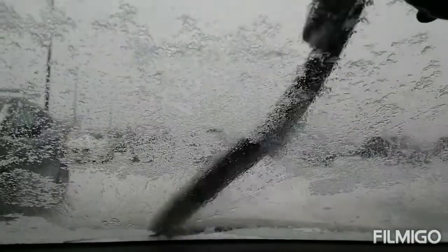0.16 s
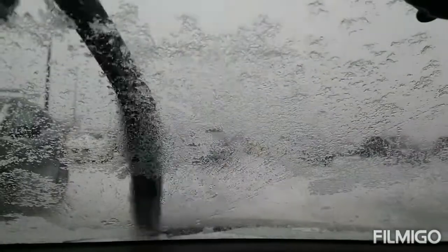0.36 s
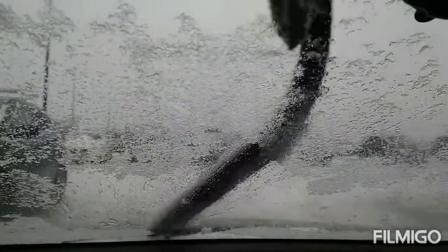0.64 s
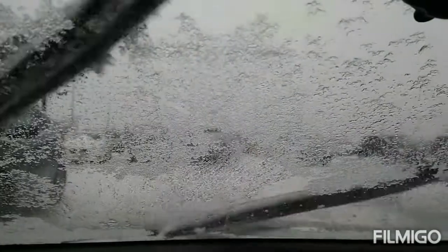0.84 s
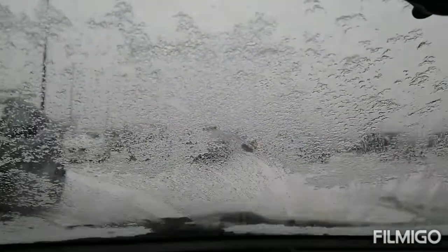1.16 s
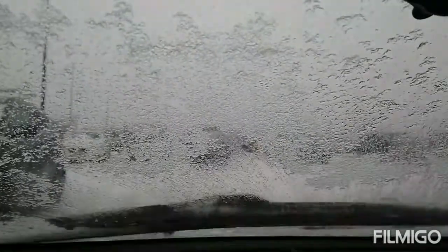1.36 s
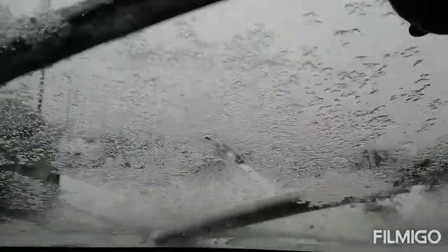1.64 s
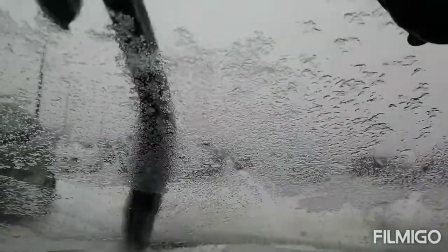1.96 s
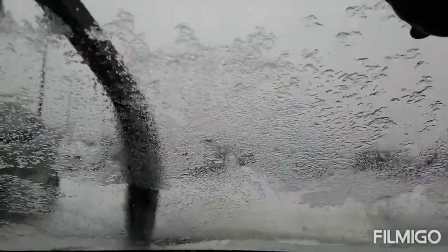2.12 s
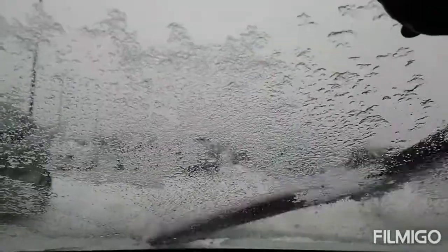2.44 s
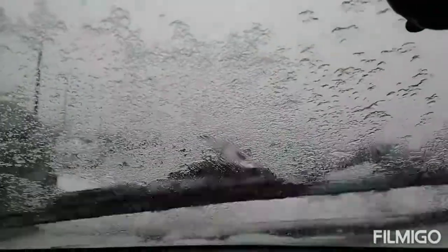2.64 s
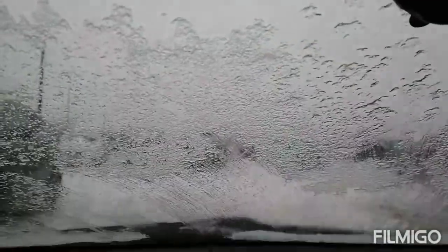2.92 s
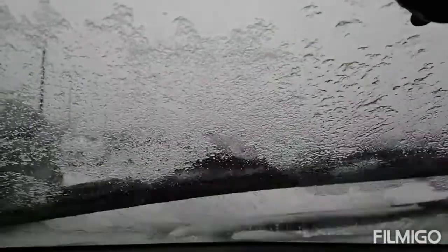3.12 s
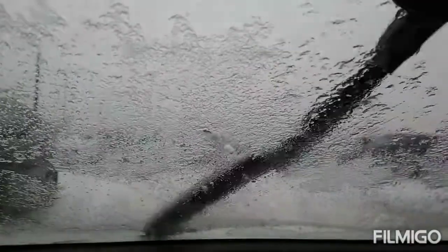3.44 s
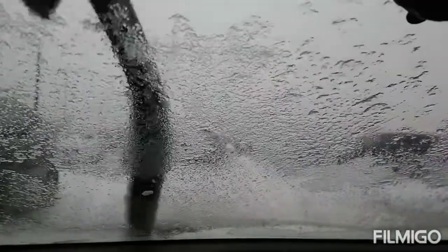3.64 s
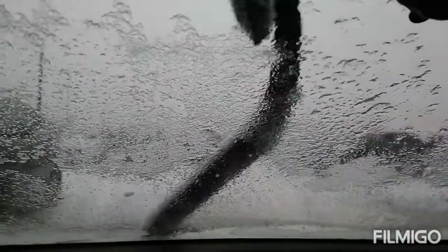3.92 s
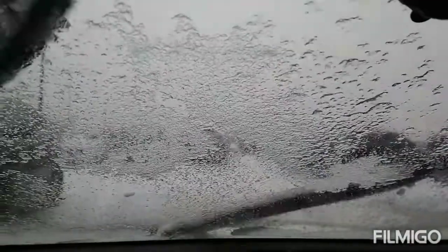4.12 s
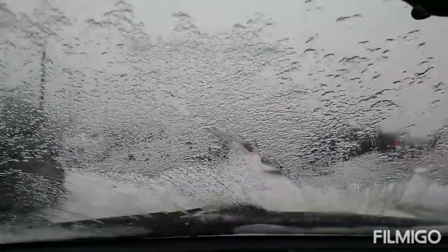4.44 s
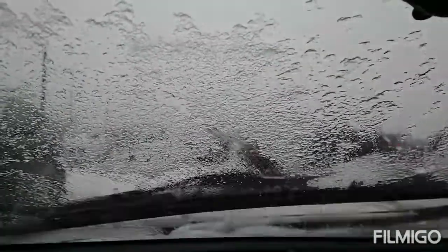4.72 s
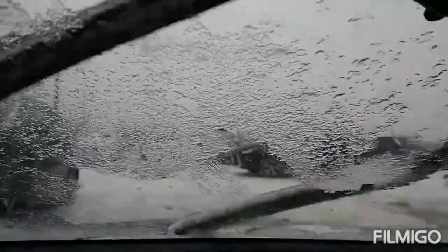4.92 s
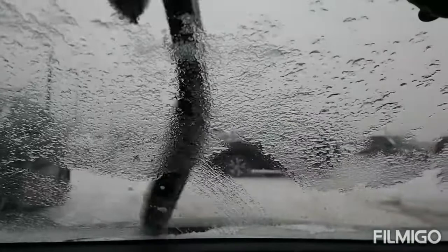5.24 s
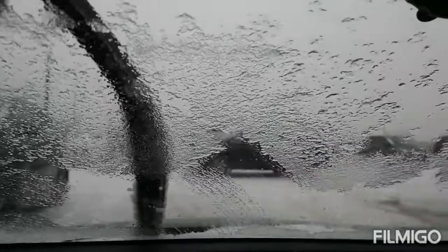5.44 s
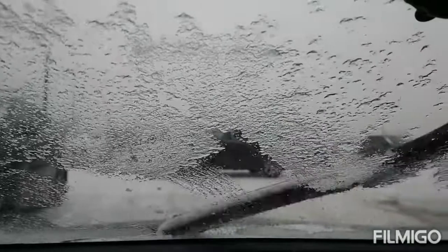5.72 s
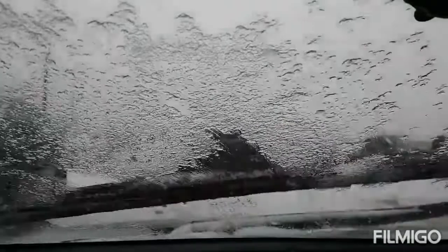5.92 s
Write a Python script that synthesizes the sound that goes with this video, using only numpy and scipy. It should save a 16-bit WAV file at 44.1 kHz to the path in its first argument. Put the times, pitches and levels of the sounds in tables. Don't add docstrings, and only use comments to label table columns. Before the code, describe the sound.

Inside a parked car in wintry weather, a close stereo microphone hears wiper blades working over an icy, slushy windshield. A faint steady fan and weather hiss is there from the start, as an up stroke ends and the blades turn at about 0.5 seconds. They scrape down, crushing a lump of ice near 1.0, then thump dully at 1.25 and turn with a small knock around 1.35. The cycle repeats every 1.65 seconds or so, with low turns near 3.0 and 4.7 and brief softer dips at the top near 2.2, 3.85 and 5.5. Each stroke is a gritty, crunching rasp with fine sizzle, glass rumble and uneven, shuddering cabin boom. Thumps return around 2.9 and 4.6, the last with the loudest knock. From about 3.5 seconds gusts throw pattering sleet on the glass. The final down stroke is still scraping around 6 seconds.

```python
import sys
import numpy as np
from scipy import signal
from scipy.fft import rfft, irfft, next_fast_len
from scipy.io import wavfile
from scipy.ndimage import uniform_filter1d

SR = 44100
rng = np.random.default_rng(int(sys.argv[2]) if len(sys.argv) > 2 else 0)


def nominal_scale(level):
    x = np.asarray(level, float) / 20
    return 10 ** x


def output_pcm(signal):
    pcm = np.clip(np.atleast_2d(signal).T, -1, 1) * 32767
    wavfile.write(sys.argv[1], SR, np.round(pcm).astype(np.int16))


N = 267731

# [Hz, dB per Hz]
LEFT_PORT = [(25, -75), (36, -42), (180, -46), (300, -52.5), (480, -53), (1200, -62.5), (3300, -60.5),
             (4050, -68.5), (4700, -63.5), (6400, -63.5), (7500, -70.5), (8050, -80.5), (8800, -73.5),
             (15500, -84)]
RIGHT_PORT = [(25, -77), (36, -46.5), (180, -47.5), (300, -55), (440, -56), (1200, -63), (1800, -61.5),
              (2200, -61.5), (4300, -59), (5000, -61), (7200, -81.5), (8000, -99.5), (11500, -88.5),
              (15000, -84)]
PORT_LAG_S = 0.0005
# [Hz, Hz, dB]
CABIN_MODES = [(41.2, 12, 4.5), (70, 27, -1.3), (111.3, 11, -0.5), (129, 20, -6), (170.6, 66, 3.2)]
# [Hz, Hz, dB]
PANE_MODES = [(237, 65, 1.5), (286, 16, 1.5), (368.2, 30, 2), (530, 160, -8), (796, 80, -2.5),
              (1050, 760, 2)]
# [Hz, Hz, dB]
BLADE_MODES = [(1826, 72, 6.5), (2390, 220, 2.5), (3400, 550, -5), (4820, 650, 2), (4960, 320, -5)]

# [s, dB]
SLEET = [(0, -100), (3.3, -67), (3.68, -51), (3.75, -54), (3.82, -47), (3.9, -58), (4.35, -47.5),
         (4.55, -51), (4.7, -52.5), (4.8, -49), (5.2, -60), (5.43, -51), (5.55, -54), (6.07, -52)]
# [s, dB, s]
CHIPS = [
    (1.01, -21.5, 0.013),
    (1.288, -35, 0.014),
    (2.43, -28, 0.016),
    (4.758, -31, 0.011),
]
# [s, dB]
THUMPS = [
    (1.248, -12.5),
    (1.283, -17.5),
    (1.366, -17),
    (2.225, -28),
    (2.908, -12),
    (2.986, -15.5),
    (4.582, -16.5),
    (4.637, -14),
    (5.555, -18),
]
# [s, dB]
KNOCKS = [
    (1.348, -29),
    (3.006, -28),
    (4.657, -26.5),
]

LOW_TURN_S, CYCLE_S, TOP_TURN_S = 1.371, 1.656, 0.822
# [s, dB, dB]
BITE = [(0.012, -26.5, 12), (0.05, -9.5, -3), (0.099, 2, -7), (0.25, 1.5, 2), (0.45, -0.3, -1.5),
        (0.62, -1.5, -1.5), (0.73, -6.5, -0.5), (0.785, -15, 2), (0.812, -22.5, 8), (0.87, -22.5, -4),
        (0.919, -7, 11), (1.04, 1, 4), (1.11, -0.5, 2), (1.19, 3.5, 1), (1.37, 2.2, 4.5), (1.46, -0.5, 1),
        (1.53, 1.5, -4.5), (1.6, -12.5, 5)]
# [s, dB, dB, dB, dB]
STROKES = [
    (0.15, 0.5, 1, -0.5, 0.1),
    (0.95, -1.5, -1.5, -1.8, 1.1),
    (1.8, 1.9, 1.7, 0.1, 0.5),
    (2.6, -0.8, 0.1, -0.7, 1),
    (3.45, 1.6, 1.6, 1.1, -0.5),
    (4.3, -1.4, -0.4, 0.7, 1.5),
    (5.1, 1, -0.1, -1.7, -0.3),
    (5.9, -1.3, 1.8, -1.2, 1),
]
# [s, dB]
JUDDERS = [(0.02, 0.5), (0.3, 2.5), (0.8, 4.5), (1.03, 3.5), (1.15, 1.5), (1.27, 0), (1.56, 2.5),
           (1.92, 3.5), (2.44, 4.5), (2.72, 1.5), (3.14, 0.5), (3.3, -1), (3.5, -3.5), (3.8, 0),
           (3.95, -0.5), (4.3, -0.5), (4.41, -0.5), (4.86, 5.5), (4.96, 5.5), (5.3, 3), (5.42, 0.5),
           (5.75, 1.5), (6.03, 2.5)]
JUDDER_S, JUDDER_IN_PANE, JUDDER_IN_SCRAPE = 0.045, 0.35, 0.12
# [s, dB]
PATCHES = [(0.2, -0.5), (0.82, -1), (1.5, -3.5), (1.78, 2), (2.08, 0.5), (2.42, 1), (2.48, -1), (2.75, 0.5),
           (3.18, -2.5), (3.4, 1.5), (3.55, -0.5), (4.2, -0.5), (4.58, -1), (4.93, 0.5), (5.35, -2),
           (5.62, 1), (5.83, 1)]
PATCH_S, PATCH_IN_DULL, PATCH_IN_SIZZLE = 0.029, 0.86, 1.3

CREEP = 0.073
HEAP_S, HEAP_WIDTH_S, HEAP_DB = 1.375, 0.16, 3.5
WET_FROM, WET_UP_DB, WET_DOWN_DB = 0.48, 0, -7

IDLE_DB, AIR_DB = -44.5, -67.5
SCRAPE_DB, PANE_DB, BOOM_DB, SIZZLE_DB, SPRAY_DB = -27, -27.5, -23, -44.5, -46.5
PANE_IDLE_DB, PANE_LAG_S = -39, 0.0083
PANE_FOLLOWS, BOOM_FOLLOWS = (0.31, 0.31), (0.07, 0.09)
SIZZLE_FOLLOWS, SPRAY_FOLLOWS = (0.28, 0.88), (0.3, 0.8)

ROUND_DB, ROUND_SPREAD_DB, ROUND_FROM_HZ = -7.5, 5.5, 6800
ROUND_OWN_SHARE, ROUND_RISE_DB = 0.4, 5


def rms_one(x):
    mean = np.mean(np.atleast_2d(x), axis=0)
    return x / np.sqrt(np.mean(mean ** 2) + 1e-20)


def in_time(rows):
    s, *columns = np.transpose(rows)
    return [np.interp(np.arange(N) / SR, s, c) for c in columns]


def drift(rate_hz):
    pole = np.exp(-2 * np.pi * rate_hz * 40 / SR)
    noise = rng.standard_normal(N // 40 + 2002)
    slow = signal.lfilter([1], [1, -2 * pole, pole ** 2], noise)[2000:]
    return np.interp(np.arange(N) / 40, np.arange(len(slow)), rms_one(slow))


def judder(rows, width_s):
    t = np.arange(0, N, 40) / SR
    swell = sum(db * np.exp(-0.5 * ((t - s) / width_s) ** 2) for s, db in rows)
    return np.interp(np.arange(N) / SR, t, swell)


def motion():
    into = (np.arange(N) / SR - LOW_TURN_S) % CYCLE_S
    up = into < TOP_TURN_S
    share = np.where(up, into / TOP_TURN_S, (into - TOP_TURN_S) / (CYCLE_S - TOP_TURN_S))
    speed_db = 10 * np.log10(np.sin(np.pi * share) ** 2 + CREEP ** 2)
    heap_db = HEAP_DB * np.exp(-0.5 * ((into - HEAP_S) / HEAP_WIDTH_S) ** 2)
    wet_db = np.where(up, WET_UP_DB, WET_DOWN_DB) * np.clip((share - WET_FROM) / 0.25, 0, 1)
    s, *columns = np.transpose(BITE)
    bite_db, bright_db = [np.interp(into, s, c, period=CYCLE_S) for c in columns]
    return bite_db, bright_db, speed_db, heap_db, wet_db


def grains(per_s, spread_db, alike, lag_s=0):
    sizes = nominal_scale(spread_db * np.minimum(rng.exponential(1, (3, N)), 5)) * rng.choice([-1, 1], (3, N))
    shared, left, right = sizes * (rng.random((3, N)) < per_s / SR)
    late = np.roll(shared, round(lag_s * SR))
    alike = np.clip(alike, 0, 1)
    return np.sqrt(alike) * np.array([shared, late]) + np.sqrt(1 - alike) * np.array([left, right])


def through_ports(x, low_hz, high_hz, modes=(), between_db=0):
    size = next_fast_len(N, real=True)
    hz = np.maximum(np.fft.rfftfreq(size, 1 / SR), 1)
    band = 1 / np.sqrt((1 + (low_hz / hz) ** 8) * (1 + (hz / high_hz) ** 8))
    power = nominal_scale(between_db) ** 2
    power = power + sum(nominal_scale(db) ** 2 / (1 + (2 * (hz - f) / w) ** 2) for f, w, db in modes)
    ports = []
    for port in (LEFT_PORT, RIGHT_PORT):
        port_hz, port_db = np.transpose(port)
        ports.append(nominal_scale(np.interp(np.log(hz), np.log(port_hz), port_db)))
    return rms_one(irfft(rfft(x, size) * band * np.sqrt(power) * ports, size)[:, :N])


def ring(events, hz, t60, soft_s):
    out, t = np.zeros(N + SR), np.arange(SR // 4) / SR
    shape = np.sin(2 * np.pi * hz * t) * nominal_scale(-60 * t / t60) * (1 - np.exp(-t / soft_s))
    shape = shape / np.max(np.abs(shape))
    for s, db in events:
        start = round(s * SR)
        out[start:start + len(t)] += nominal_scale(db) * shape
    return out[:N]


def with_sleet(db, sleet_share_db):
    return np.hypot(nominal_scale(db), nominal_scale(in_time(SLEET)[0] + sleet_share_db))


def idle():
    air = rng.standard_normal((2, N))
    return nominal_scale(IDLE_DB) * through_ports(air, 360, 2100) + nominal_scale(AIR_DB) * through_ports(air, 7300, SR / 2)


def spray():
    bite_db, _, speed_db, _, wet_db = motion()
    dry_db = in_time(STROKES)[-1]
    dust_db = SPRAY_DB + dry_db + wet_db + PATCH_IN_SIZZLE * judder(PATCHES, PATCH_S)
    dust_db = dust_db + SPRAY_FOLLOWS[0] * bite_db + SPRAY_FOLLOWS[1] * speed_db + 1.8 * drift(9.7)
    gain = with_sleet(dust_db, sleet_share_db=2.2) * nominal_scale(4.5 + 0.5 * drift(10))
    return gain * through_ports(grains(20000, 3.0, alike=0.01), 15300, SR / 2)


def chips():
    t = np.arange(N) / SR
    burst = sum(nominal_scale(db) * np.exp(-np.maximum(t - s, 0) / length) * (t >= s) for s, db, length in CHIPS)
    bright = signal.lfilter([1, -0.95], [1], grains(5100, 2.3, alike=0.1))
    return burst * through_ports(bright, 2500, 15750)


def linkage():
    thumps = -ring(THUMPS, 94.0, t60=0.073, soft_s=0.0055)
    knocks = ring(KNOCKS, 740, t60=0.025, soft_s=0.0015) * nominal_scale(2)
    knocks = knocks + ring(KNOCKS, 630, t60=0.02, soft_s=0.0015) * nominal_scale(-2)
    return thumps * nominal_scale(np.array([[1.1], [-1.1]])) + knocks * nominal_scale(np.array([[0.5], [-0.5]]))


def blades():
    bite_db, bright_db, speed_db, heap_db, wet_db = motion()
    strength_db, pane_db, cabin_db, dry_db = in_time(STROKES)
    judder_db, patch_db = judder(JUDDERS, JUDDER_S), judder(PATCHES, PATCH_S)
    grip_db = 0.5 * drift(22)

    boom_db = BOOM_DB + cabin_db + BOOM_FOLLOWS[0] * bite_db + BOOM_FOLLOWS[1] * speed_db + heap_db + judder_db
    deep = through_ports(grains(3000, 2.6, alike=1.0), 33, 87, CABIN_MODES, between_db=-7)
    boom = through_ports(grains(3000, 2.6, alike=0.87), 60.5, 290, CABIN_MODES, between_db=-6.5)
    air = nominal_scale(boom_db) * (nominal_scale(-8.0) * deep + nominal_scale(-1.5) * boom)

    scrape_db = SCRAPE_DB + strength_db + bite_db + JUDDER_IN_SCRAPE * judder_db
    pane_db = PANE_DB + pane_db + PANE_FOLLOWS[0] * bite_db + PANE_FOLLOWS[1] * speed_db
    t = np.arange(N) / SR
    late_db = np.interp(t - PANE_LAG_S, t, pane_db)
    pane_db = 10 * np.log10(nominal_scale(late_db) ** 2 + nominal_scale(PANE_IDLE_DB) ** 2)
    thin_db = 0.72 * pane_db + 0.29 * scrape_db
    pane = through_ports(grains(5000, 1.8, alike=0.77), 214, 564, PANE_MODES, between_db=-10.5)
    thin_grains = grains(8000, 2.15, alike=0.34, lag_s=PORT_LAG_S)
    thin = through_ports(thin_grains, 471, 1890, PANE_MODES, between_db=-0.5)
    glass = nominal_scale(pane_db - 0.5 + JUDDER_IN_PANE * judder_db + 0.32 * grip_db) * pane
    glass = glass + nominal_scale(thin_db - 5.0 + 0.42 * grip_db) * thin

    ice = grains(14000, 2.56, alike=0.25, lag_s=PORT_LAG_S)
    dull = through_ports(ice, 1500, 3490, BLADE_MODES, between_db=3.5)
    bright = through_ports(ice, 3300, 10700, BLADE_MODES, between_db=3.5)
    dull_db = scrape_db - 4.5 - bright_db / 2 + 0.7 * drift(30) + PATCH_IN_DULL * patch_db
    sharp_db = scrape_db - 4.0 + bright_db / 2 + 0.7 * drift(30) + patch_db
    scrape = with_sleet(dull_db, sleet_share_db=1.0) * dull + with_sleet(sharp_db, sleet_share_db=8.5) * bright

    sizzle_db = SIZZLE_DB + dry_db + 0.9 * wet_db + PATCH_IN_SIZZLE * patch_db
    sizzle_db = sizzle_db + SIZZLE_FOLLOWS[0] * bite_db + SIZZLE_FOLLOWS[1] * speed_db
    sizzle_gain = with_sleet(sizzle_db, sleet_share_db=1.5) * nominal_scale(6.5 + grip_db + 0.42 * drift(25))
    sizzle = sizzle_gain * through_ports(grains(20000, 2.8, alike=0.012), 6570, 9500)
    return air + glass + nominal_scale(-2.12 + grip_db) * scrape + sizzle


def scene():
    return idle() + spray() + chips() + linkage() + blades()


def round_treble(x):
    hop, start = 1024, 1024 - 56
    n, k = np.arange(2 * hop) + 0.5, np.arange(hop) + 0.5
    line_hz = k * SR / (2 * hop)
    cosines = np.cos(np.pi / hop * np.outer(k, n + hop / 2)) * np.sqrt(2 / hop)
    basis = np.sin(np.pi * n / (2 * hop)) * cosines
    blocks = np.pad(x, ((0, 0), (hop + start, 2 * hop - (N + start) % hop))).reshape(2, -1, hop)
    lines = np.concatenate([blocks[:, :-1], blocks[:, 1:]], axis=2) @ basis.T

    scrape = np.sqrt(np.mean(lines[..., 93:280] ** 2, axis=2, keepdims=True))
    own = np.sqrt(np.mean(lines.reshape(2, -1, 32, 32) ** 2, axis=3))
    mood_db = 1.9 * rng.standard_normal(scrape.shape)
    rise_db = ROUND_RISE_DB * np.log2(np.maximum(line_hz[16::32] / 8000, 1))
    lasting = np.sqrt(3) * uniform_filter1d(rng.standard_normal((len(own[0]), 128)), size=3, axis=0)
    step = own ** ROUND_OWN_SHARE * scrape ** (1 - ROUND_OWN_SHARE) * nominal_scale(ROUND_DB + rise_db + mood_db)
    step = np.repeat(step, 32, axis=2) * np.repeat(nominal_scale(ROUND_SPREAD_DB * lasting), 8, axis=1) + 1e-9
    rounded = np.sign(lines) * np.floor(np.abs(lines) / step + 0.4) * step

    frames = np.where(line_hz > ROUND_FROM_HZ, rounded, lines) @ basis
    lapped = frames[:, 1:, :hop] + frames[:, :-1, hop:]
    return lapped.reshape(2, -1)[:, start:start + N]


def roll_off(x):
    return signal.sosfilt(signal.butter(12, 15750, fs=SR, output="sos"), x)


def record(dry):
    high_pass = signal.butter(4, 33, "high", fs=SR, output="sos")
    cut = signal.sosfilt(high_pass, dry)
    mix = round_treble(0.7 * np.tanh(cut / 0.7))
    return roll_off(mix)


dry = scene()
out = record(dry)
output_pcm(out)
```